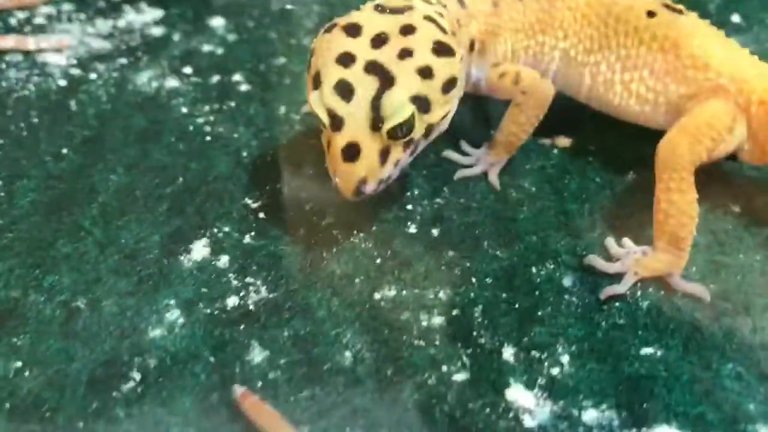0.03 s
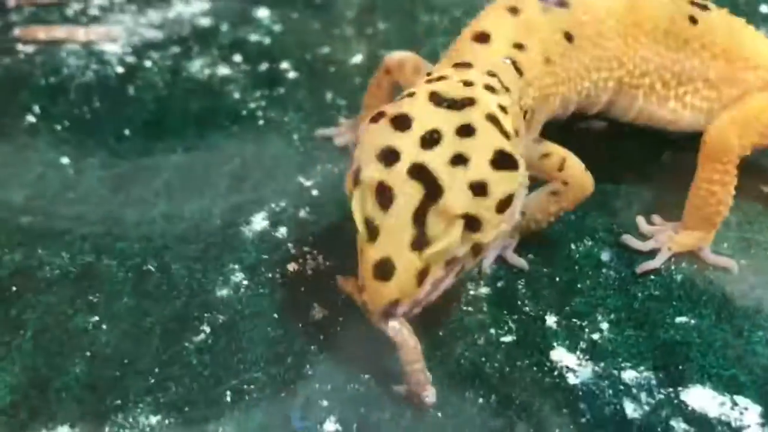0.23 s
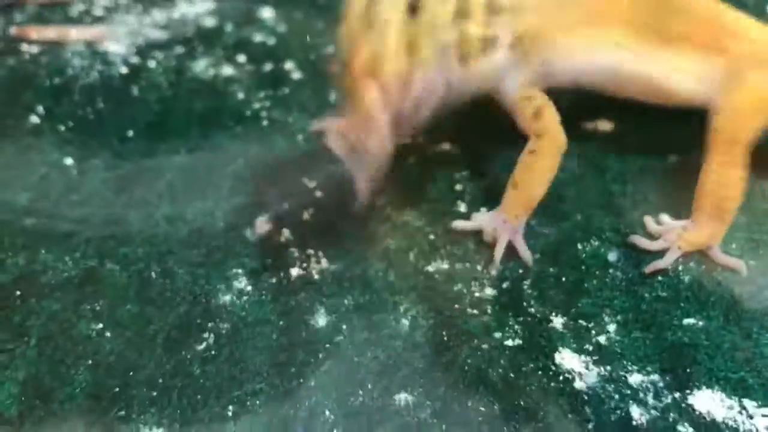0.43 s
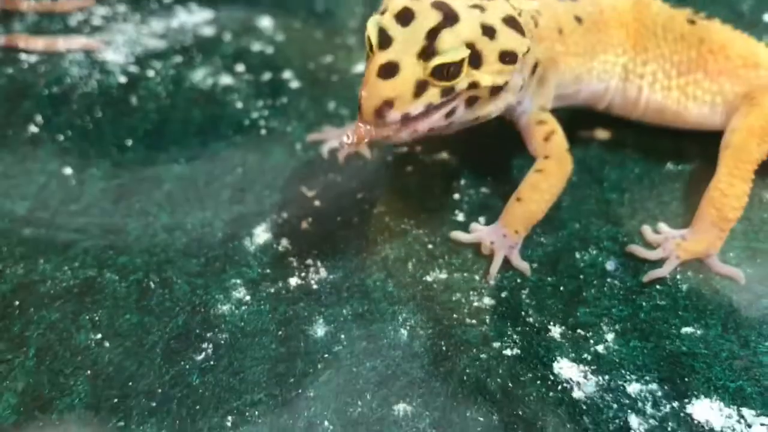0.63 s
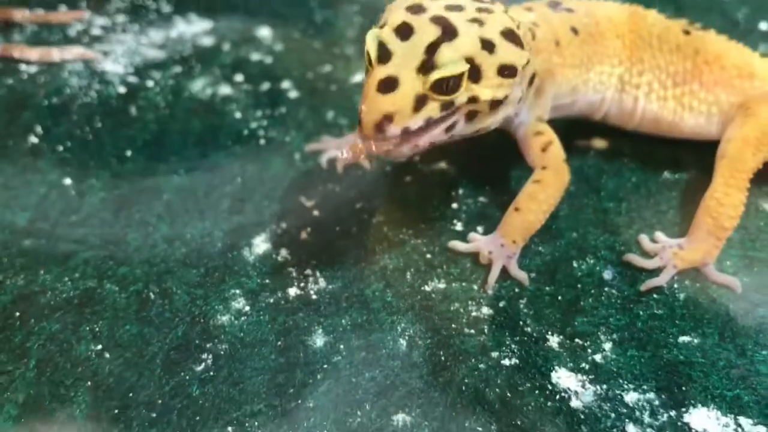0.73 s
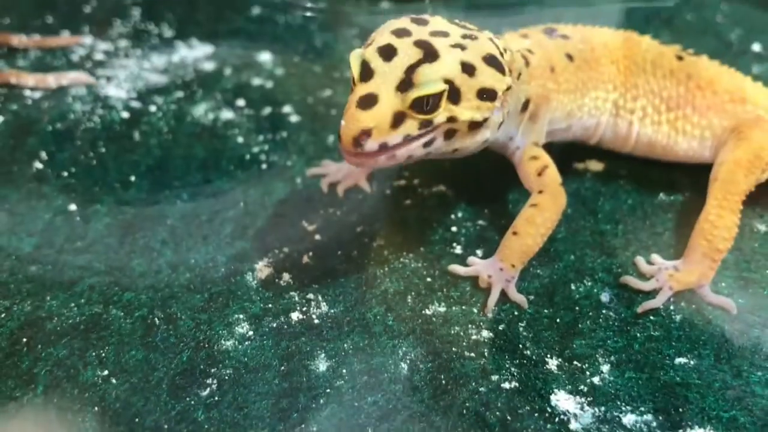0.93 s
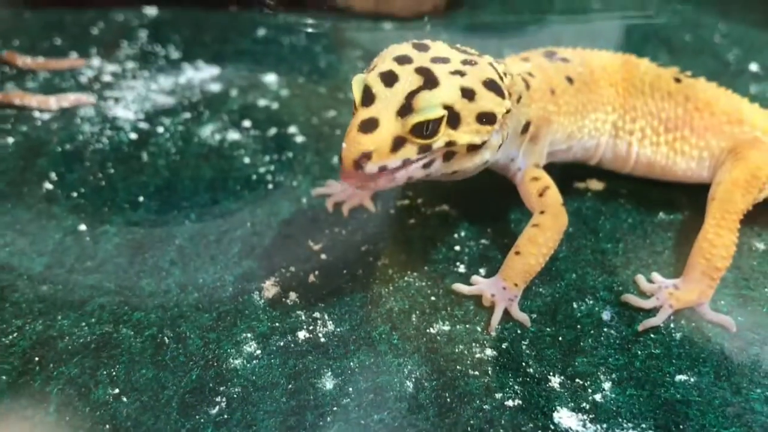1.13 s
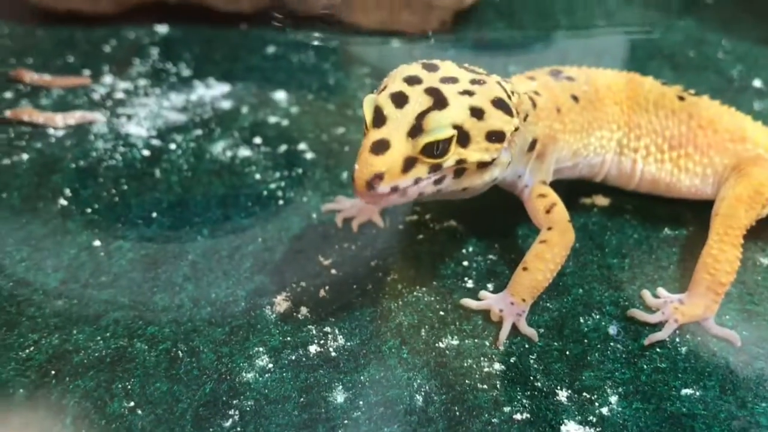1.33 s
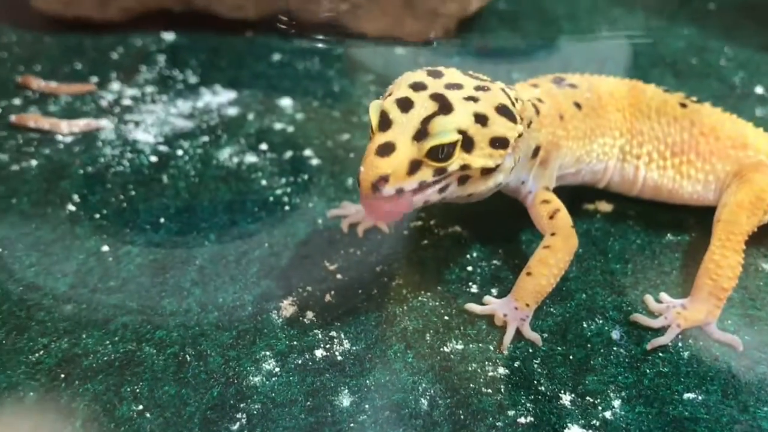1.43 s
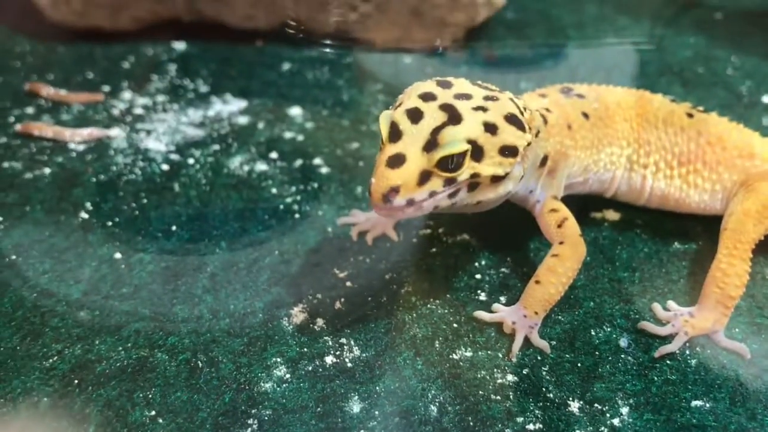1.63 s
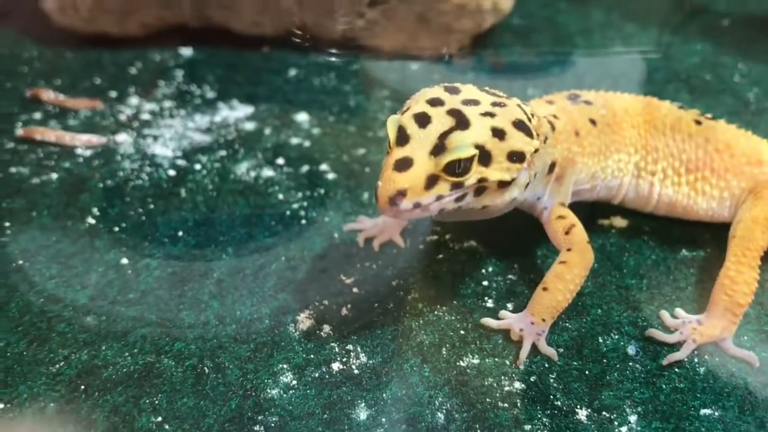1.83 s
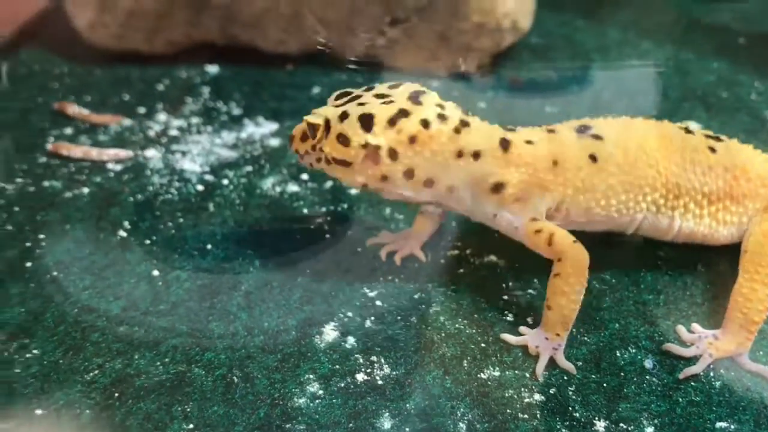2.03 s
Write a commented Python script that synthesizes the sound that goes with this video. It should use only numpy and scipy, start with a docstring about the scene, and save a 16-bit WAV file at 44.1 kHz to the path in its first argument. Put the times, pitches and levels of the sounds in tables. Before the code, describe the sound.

A small lizard's jaws snap once, dry and sharp, close to the microphone in a small tank. Light foot taps and scuffs lead into the strike; afterwards come one faint tick and the soft hum of a fan and appliance.

```python
"""Gecko striking at a worm

Close microphone on the floor of a small tank. A gecko's feet tick and scuff as it lunges, then snout
and jaws strike in three quick, dry clacks that the tank walls throw back. A faint tick follows as it
settles. Behind it is a quiet room: a fan, an appliance hum and a distant motor sinking in pitch."""
import sys
import numpy as np
from scipy import signal
from scipy.fft import rfft, irfft
from scipy.io import wavfile
from scipy.ndimage import uniform_filter1d

SR = 44100
rng = np.random.default_rng(int(sys.argv[2]) if len(sys.argv) > 2 else 0)


def generate_wav(signal):
    """Clip the signal to [-1, 1] and save it as 16-bit WAV at the path in sys.argv[1]."""
    frames = np.transpose(np.atleast_2d(signal))
    scaled = np.clip(frames, -1, 1) * 32767
    pcm = np.round(scaled).astype(np.int16)
    wavfile.write(sys.argv[1], SR, pcm)


N = 92610


def amp(db):
    """Decibels to gain."""
    return 10 ** (np.asarray(db) / 20)


def unit(x):
    """Scales to rms 1."""
    return x / np.sqrt(np.mean(x ** 2) + 1e-20)


def read(points, hz):
    """Reads a table on a log-frequency axis."""
    point_hz, value = np.transpose(points)
    return np.interp(np.log(hz + 1), np.log(point_hz + 1), value)


def add(mix, start_s, sound):
    """Mixes a sound in at a time."""
    part = mix[max(round(start_s * SR), 0):][:len(sound)]
    part += sound[:len(part)]


def noise(colour, size=N):
    """Noise of rms 1 with a given colour."""
    hz = np.fft.rfftfreq(size, 1 / SR)
    return unit(irfft(amp(read(colour, hz)) * np.exp(2j * np.pi * rng.random(len(hz))), size))


def drift(rate_hz):
    """Slow random wander of rms 1."""
    hz = np.fft.rfftfreq(N, 1 / SR)
    return unit(irfft(rfft(rng.standard_normal(N)) * np.exp(-(hz / rate_hz) ** 2) * (hz > 0), N))


def clack(ring_db, treble_db, t60_ratio, crack_db, push_db, pitch_ratio):
    """Snout or jaws hit: a bright crack and high modes at once, low modes and a small push just after."""
    # colour of the contact's crack: freq_hz, level_db
    crack_colour = [(200, -8), (1500, -2.5), (3500, -3.5), (5600, -7.5), (7700, -1.5), (9700, -3.5),
                    (12000, -2), (14500, 0), (16500, -10.5)]
    # resonances the hit sets ringing: pitch_hz, level_db, t60_s
    modes = [(735.7, -38.5, .012), (1106, -14.5, 0.0066), (1294, -12, 0.0096), (1600, -12.5, 0.0051),
             (1852, -3.5, 0.0074), (2255, -3.5, 0.0068), (2898.4, -19, 0.0081), (3535.3, -22, .0065),
             (5040, -23, .007), (6300, -33, 0.0071), (7156.9, -11, .0026), (8120, -10, 0.0025),
             (9250, -28, .006), (11142, -18, 0.0055), (11700, -12.5, .0012)]
    contact_s, crack_s, push_s, body_lag_s = .00015, .0009, .0001, .00026
    treble_hz = 3300
    t = np.arange(SR // 20) / SR
    late = np.maximum(t - body_lag_s, 0)
    out = amp(crack_db) * noise(crack_colour, size=len(t)) * np.exp(-t / crack_s)
    for hz, db, t60 in modes:
        age, tilt_db = (t, treble_db) if hz > treble_hz else (late, 0)
        attack = 1 - np.exp(-age / contact_s)
        decay = amp(ring_db + db + tilt_db - 60 * age / (t60 * t60_ratio))
        out += attack * decay * np.sin(2 * np.pi * hz * pitch_ratio * age)
    push_age = late / push_s
    return out + amp(push_db) * push_age * (2 - push_age) * np.exp(1 - push_age)


def tap(knock_db, pitch_hz, decay_s, tick_db):
    """A foot or jaw touches lightly: one damped knock with a tiny tick."""
    # colour of the tick: freq_hz, level_db
    tick_colour = [(300, -3.5), (2500, 2.5), (6000, -3.5), (9000, -9), (14000, -6), (16000, -17.5)]
    tick_s = .0024
    t = np.arange(SR // 16) / SR
    knock = amp(knock_db) * np.sin(2 * np.pi * pitch_hz * t) * np.exp(-t / decay_s)
    return knock + amp(tick_db) * noise(tick_colour, size=len(t)) * np.exp(-t / tick_s)


def scuff(length_s, rise_s, release_s, rub_db, hiss_db):
    """Skin slides over the tank floor: a grainy rub with a fine hiss on top."""
    # colour of the dull rub: freq_hz, level_db
    rub_colour = [(100, 1), (300, 4.5), (520, 2), (900, -1), (2200, -1.5), (3100, -18.5), (5000, -13),
                  (8000, -35), (16000, -45)]
    # colour of the fine hiss: freq_hz, level_db
    hiss_colour = [(200, -19), (2000, 4), (4500, -2.5), (8000, -1), (12000, -2.5), (15000, -2),
                   (16000, -39)]
    t = np.arange(N) / SR
    envelope = np.minimum(t / rise_s, 1) ** .5 * np.exp(-np.maximum(t - length_s, 0) / release_s)
    grain = np.exp(.22 * drift(rate_hz=150))
    return envelope * (amp(rub_db) * noise(rub_colour) * grain + amp(hiss_db) * noise(hiss_colour))


def tank(x):
    """Small bodies radiate little bass; the tank walls add quick echoes."""
    # echoes off the near walls: delay_s, gain
    walls = [(.001582, 0.0019), (.002153, -0.16), (.003219, 0.0032), (.004545, 0.0087)]
    radiate_hz, far_wall_s, far_wall_db = 248, .0165, -29
    direct = signal.sosfilt(signal.butter(2, radiate_hz, "high", fs=SR, output="sos"), x)
    out = direct.copy()
    for delay_s, gain in walls:
        add(out, delay_s, gain * direct)
    add(out, far_wall_s, amp(far_wall_db) * direct)
    return out


def room_tail(x):
    """The room answers with a short diffuse tail, each band dying at its own speed."""
    # colour of the tail: freq_hz, level_db
    tail_colour = [(150, -21.5), (600, 8), (1200, 4), (2400, -7), (4000, -0.5), (9000, -8.5), (16000, -1)]
    # decay of the tail: freq_hz, t60_s
    tail_t60 = [(200, 0.13), (1000, 0.047), (2400, 0.17), (6000, 0.09), (15000, .14)]
    tail_db, build_s = -21, .0066
    hz, t, bands = signal.stft(noise(tail_colour, size=SR // 2), SR, nperseg=256)
    decay = amp(-60 * t / read(tail_t60, hz)[:, None])
    tail = signal.istft(bands * decay, SR, nperseg=256)[1]
    tail *= np.minimum(np.arange(len(tail)) / SR / build_s, 1)
    return amp(tail_db) * signal.fftconvolve(x, tail / np.linalg.norm(tail))[:N]


def room_air():
    """Soft room tone with a fan's resonances and faint drifting patches."""
    # colour of the room tone: freq_hz, level_db
    air_colour = [(20, -12), (45, -12), (70, -1.5), (120, 8.5), (180, -1.5), (300, -7.5), (450, -11.5),
                  (740, -13), (950, -19), (1300, -17), (1700, -23.5), (2200, -23.5), (3200, -29.5),
                  (5000, -32.5), (8500, -35), (10000, -37), (15500, -38), (16100, -65)]
    # the fan's faint resonances: centre_hz, width_hz, rise_db
    fan = [(316, 14, 5.5), (743, 50, 4), (1310, 110, 2.5), (2050, 180, 3)]
    air_db, patch_db = -54, 1.37
    hz, _, bands = signal.stft(noise(air_colour), SR, nperseg=2048, noverlap=1536)
    patches = uniform_filter1d(rng.standard_normal(bands.shape), size=12, axis=0)  # smooth in frequency
    patches = unit(uniform_filter1d(patches, size=6, axis=1))  # and in time
    fan_db = sum(db / (1 + (2 * (hz - centre) / width) ** 2) for centre, width, db in fan)
    bands *= amp(fan_db[:, None] - patch_db * patches)
    return amp(air_db) * unit(signal.istft(bands, nperseg=2048, noverlap=1536)[1][:N])


def appliance_hum():
    """An appliance hums on one low tone, wavering in level and phase."""
    pitch_hz, level_db, waver_depth = 120.72, -58, .13
    t = np.arange(N) / SR
    waver = 1 + waver_depth * (drift(rate_hz=13) + 1j * drift(rate_hz=3.3))
    return amp(level_db) * unit((waver * np.exp(2j * np.pi * pitch_hz * t)).real)


def distant_motor():
    """A far motor drones on a tone and its octave, sinking in pitch as its level wavers."""
    # course of the drone: time_s, pitch_hz, level_db, octave_db
    course = [(0, 152.5, -61, -69), (0.248, 150.3, -53, -81.5), (0.418, 147.5, -52.5, -61),
              (0.648, 145.3, -50, -62.5), (0.899, 142.6, -74, -71.5), (1.249, 138.9, -61, -64.5),
              (1.6, 135.9, -65, -67), (2.1, 132.8, -63.5, -83)]
    waver_db = 3
    t = np.arange(N) / SR
    time_s, pitch_hz, level_db, octave_db = np.transpose(course)
    phase = 2 * np.pi * np.cumsum(np.interp(t, time_s, pitch_hz)) / SR
    tone = amp(np.interp(t, time_s, level_db)) * unit(np.sin(phase))
    flutter = 1 + .27 * drift(rate_hz=4)
    octave = amp(np.interp(t, time_s, octave_db)) * unit(np.sin(2 * phase) * flutter)
    return (tone + octave) * amp(waver_db * drift(rate_hz=7))


def scene():
    """The gecko close up in its tank, over the quiet room."""
    # snout and jaws striking: start_s, ring_db, treble_db, t60_ratio, crack_db, push_db, pitch_ratio
    clacks = [(.20521, -7, -0.2, 1.7, -18, -34.5, .994), (.21831, 0.9, 2.2, 1.7, -19.5, -36, 1.0),
              (0.2388, -4, -4, 1.1, -22.5, -38, 1.022)]
    # light touches of feet and jaw: start_s, knock_db, pitch_hz, decay_s, tick_db
    taps = [(0.0608, -44, 2420, .002, -42), (.0635, -38.5, 670, 0.0025, -75),
            (0.1201, -28, 1400, 0.00064, -49), (0.1197, -30.5, 507, .0013, -54),
            (0.184, -38.5, 1500, .0011, -61), (0.5403, -49.5, 485, 0.0061, -50.5)]
    # skin and feet sliding: start_s, length_s, rise_s, release_s, rub_db, hiss_db
    scuffs = [(0.06, 0.068, 0.035, 0.019, -53, -63), (0.141, 0.14, 0.0087, 0.0066, -60, -70.5),
              (0.254, .188, 0.099, .005, -67, -65.5)]
    gecko = np.zeros(N)
    for source, events in (clack, clacks), (tap, taps), (scuff, scuffs):
        for start_s, *settings in events:
            add(gecko, start_s, source(*settings))
    near = tank(gecko)
    return (near + room_tail(near) + room_air() + appliance_hum() + distant_motor())[None]


def record(dry):
    """The mono microphone rounds off the highest peaks and sheds the deep bass and the very top."""
    ceiling, low_cut_hz, high_cut_hz = 1.3, 62, 16350
    rounded = ceiling * np.tanh(dry / ceiling)
    thinned = signal.sosfilt(signal.butter(3, low_cut_hz, "high", fs=SR, output="sos"), rounded)
    low_pass = signal.firwin(255, high_cut_hz, window=("kaiser", 9), fs=SR)
    return signal.oaconvolve(thinned, low_pass[None], "same")


dry = scene()
out = record(dry)
generate_wav(out)
```